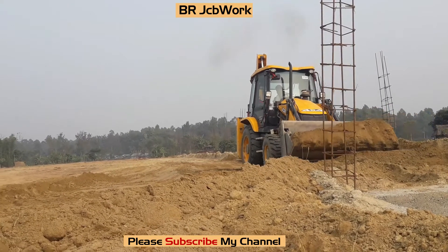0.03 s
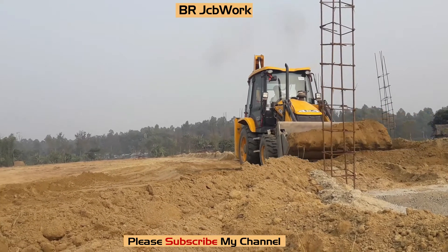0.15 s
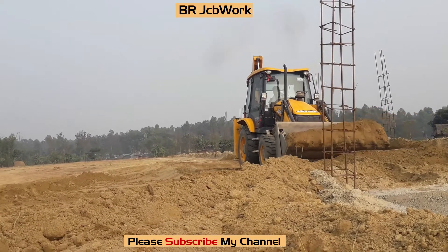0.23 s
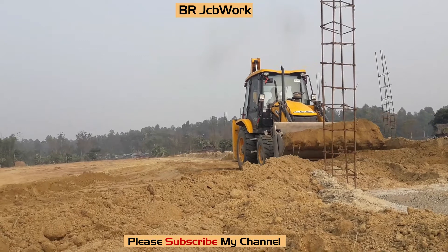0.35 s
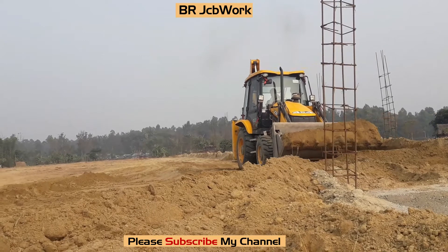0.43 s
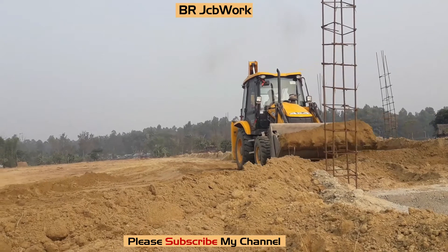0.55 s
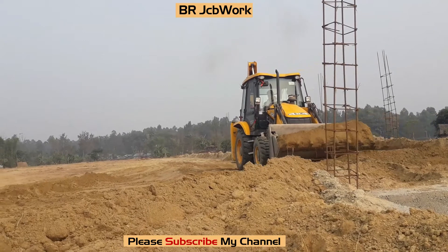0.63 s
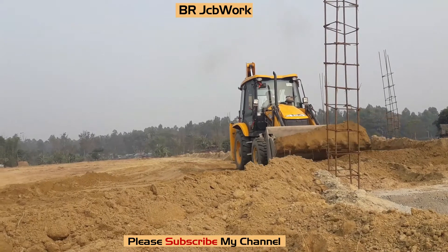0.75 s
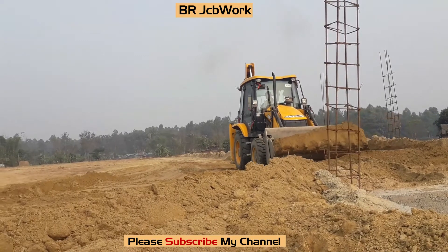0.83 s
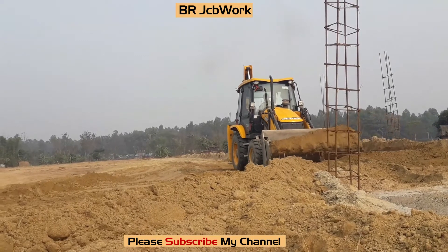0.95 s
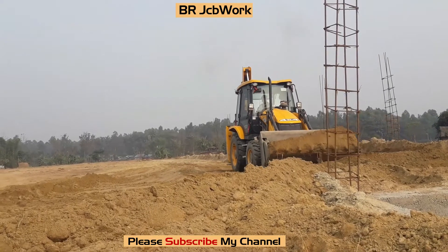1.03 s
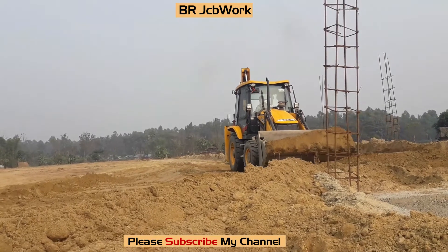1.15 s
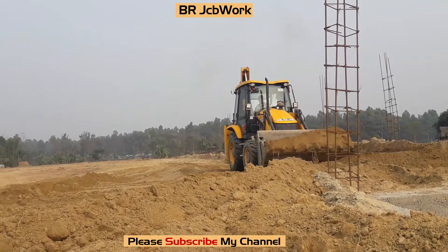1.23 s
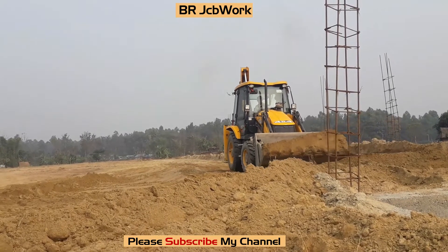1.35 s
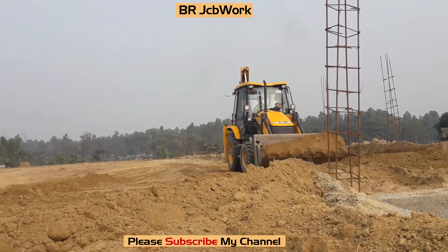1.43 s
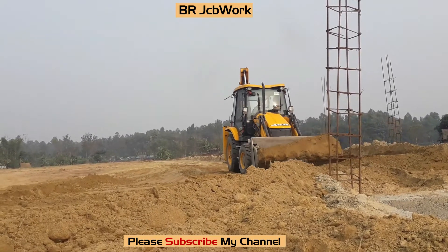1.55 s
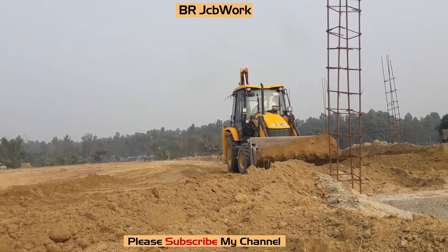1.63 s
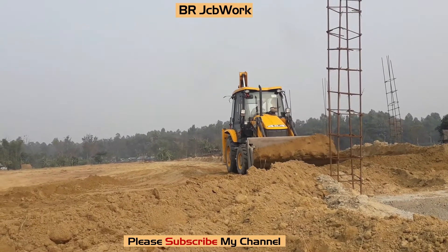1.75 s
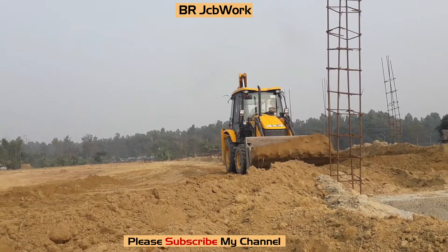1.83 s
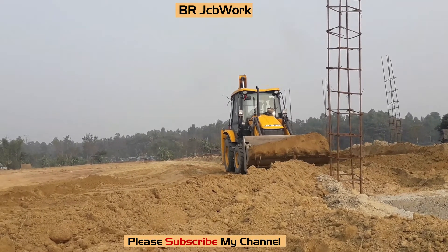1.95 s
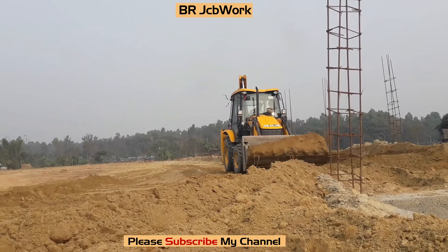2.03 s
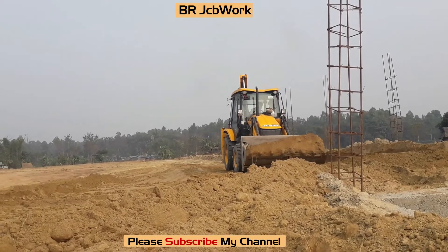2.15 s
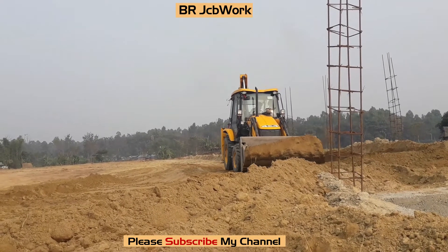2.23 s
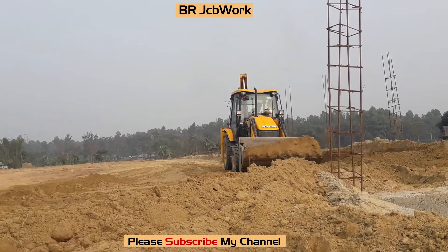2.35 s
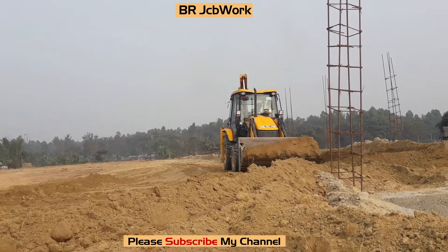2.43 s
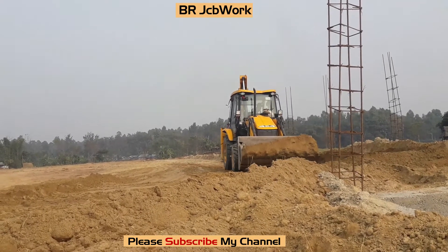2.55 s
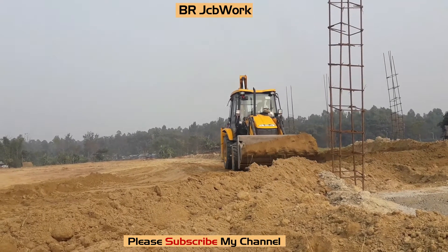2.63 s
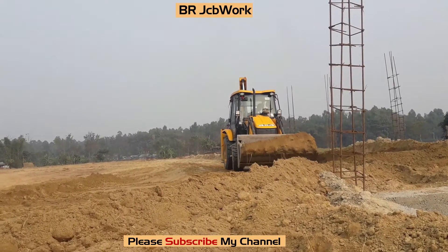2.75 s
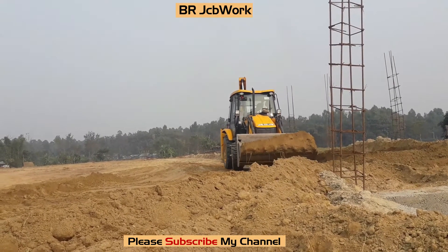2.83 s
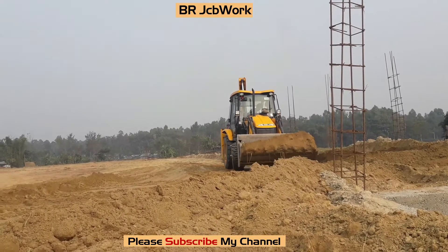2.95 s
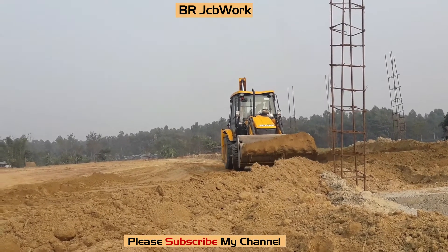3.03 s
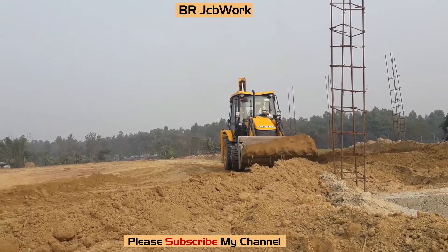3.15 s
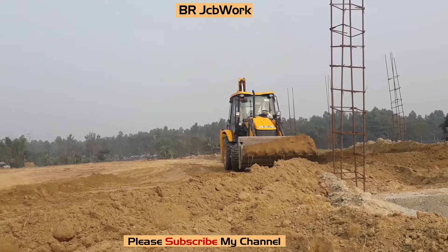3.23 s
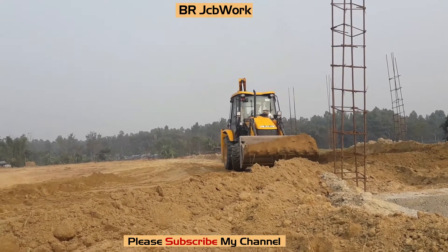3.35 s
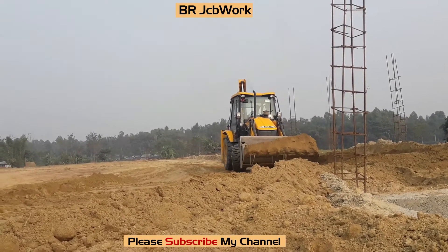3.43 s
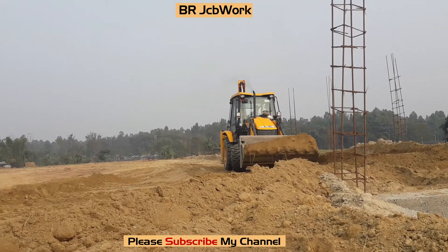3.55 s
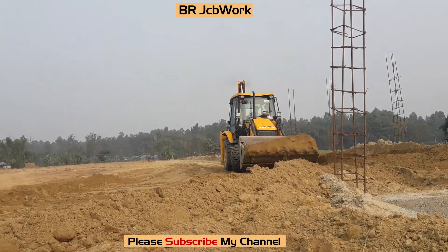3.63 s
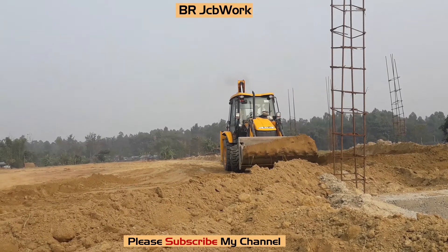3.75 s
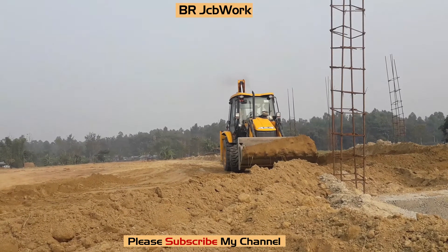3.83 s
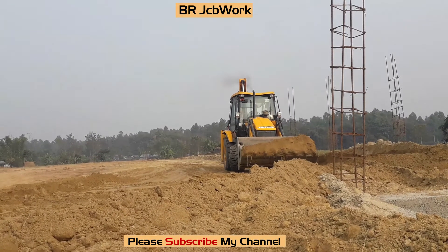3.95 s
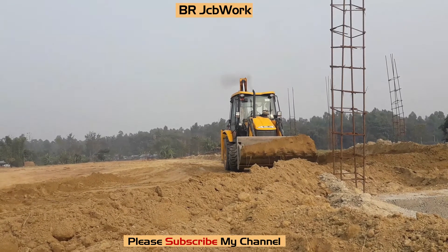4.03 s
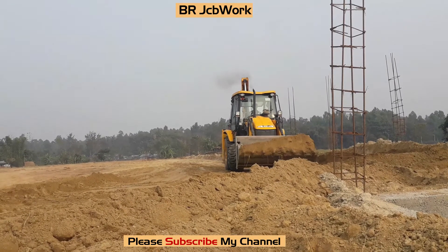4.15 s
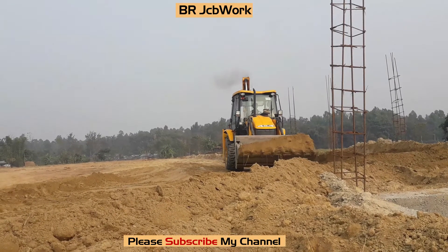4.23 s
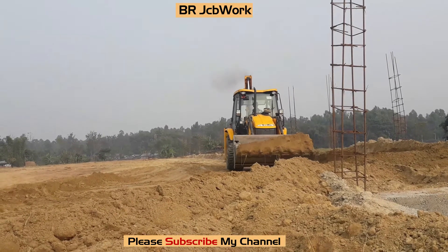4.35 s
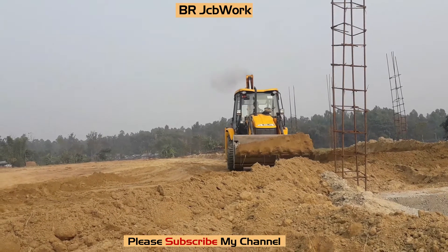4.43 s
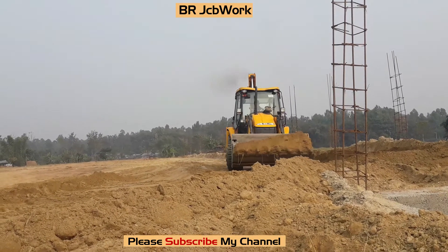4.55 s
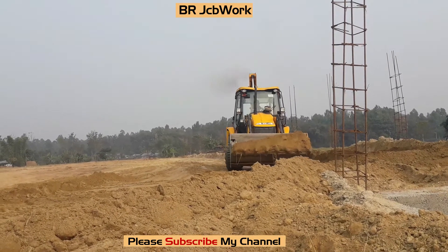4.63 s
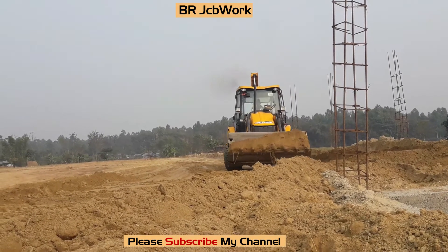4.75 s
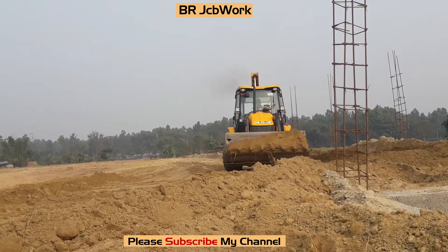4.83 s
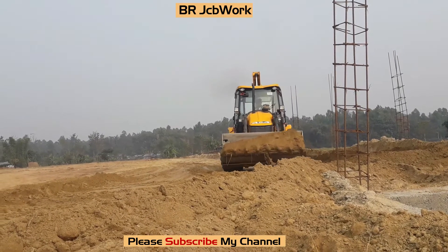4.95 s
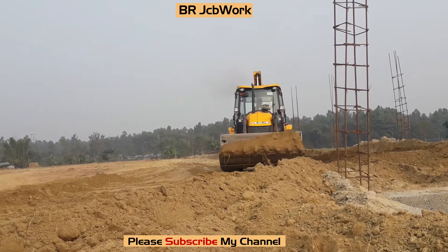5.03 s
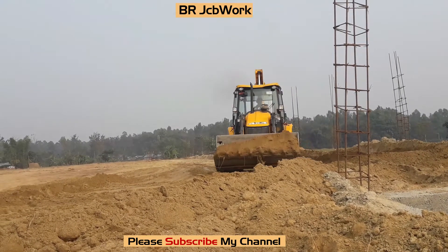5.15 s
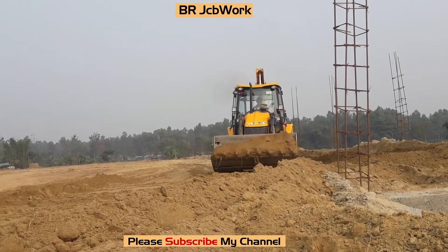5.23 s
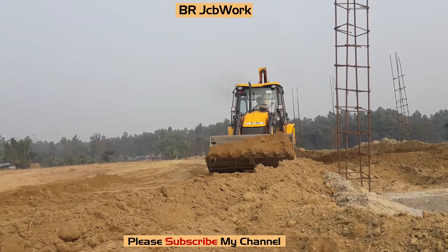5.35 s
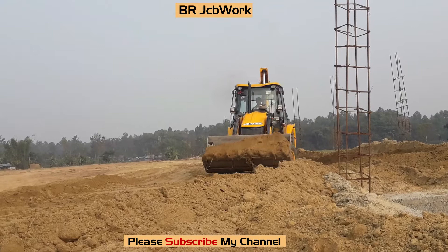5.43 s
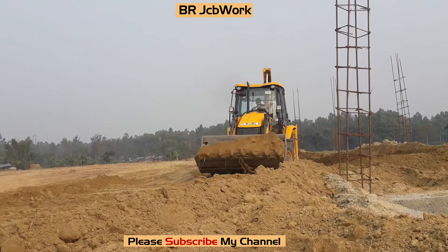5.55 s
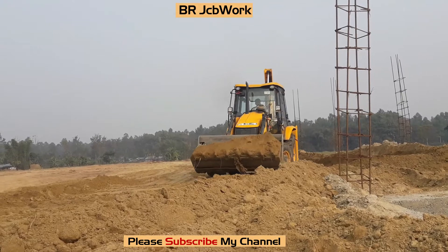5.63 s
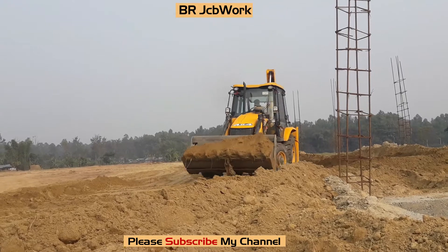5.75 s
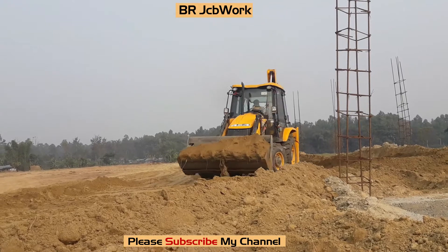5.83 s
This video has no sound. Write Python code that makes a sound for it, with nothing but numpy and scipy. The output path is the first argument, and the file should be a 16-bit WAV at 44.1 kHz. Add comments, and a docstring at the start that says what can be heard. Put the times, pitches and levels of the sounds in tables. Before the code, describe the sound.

A diesel backhoe loader works soil on an open site. Its engine starts fast and loud, eases down to a slow, soft idle near three seconds, then knocks sharply with dull low thuds and climbs back to a full roar. A thin turbo whistle falls and rises with it. Mono, fairly dry, no echo.

```python
"""Distant diesel digger

A four-cylinder digger works a soil pile in the open: eases to idle, knocks hard as fuel returns, revs up again.
Exhaust, pops and fan lines are locked to the firing rate or fan shaft; block noise, knock cracks and hiss are
filtered noise. The turbocharger whistle is narrow noise on a moving pitch; the low thuds are damped sines."""
import sys
import numpy as np
from scipy import signal
from scipy.fft import rfft, irfft
from scipy.io import wavfile
from scipy.ndimage import uniform_filter1d

SR = 44100
rng = np.random.default_rng(int(sys.argv[2]) if len(sys.argv) > 2 else 0)


def pcm_store(signal):
    """Save signal as 16-bit PCM."""
    levels = np.round(np.clip(np.atleast_2d(signal), -1, 1) * 32767)
    wavfile.write(sys.argv[1], SR, levels.astype(np.int16).T)


N = 259308  # samples

# Engine speed: (time [s], firing rate [1/s])
FIRING_RATE = [(0.0, 56.72), (0.55, 56.02), (0.8, 57.15), (1.4, 56.1), (1.9, 51.28), (2.72, 32.81),
               (2.9, 29.87), (3.02, 31.33), (3.2, 31.94), (3.35, 29.46), (3.42, 34.79), (3.5, 38.47),
               (3.8, 43.67), (3.93, 48.74), (4.41, 56.23), (4.63, 57.38), (5.3, 57.31), (5.88, 58.86)]
# Fuel burnt per firing, set by pedal and governor: (time [s], level re full [dB])
FUEL_LEVEL = [(0, -0.5), (1.0, -7), (1.45, -11), (1.9, -15.5), (2.8, -32), (2.91, -16), (2.945, -1),
              (2.99, -5.5), (3.02, -8), (3.2, -13.5), (3.31, -19), (3.365, -1.5), (3.57, 0.5), (3.6, -13),
              (3.69, -7), (3.73, -2.5), (3.93, -2), (4.0, -5), (4.25, -4), (4.6, -7), (5.88, -4)]
# Load on the crank: (time [s], level re full [dB])
CRANK_LOAD = [(0, -5), (1.0, -6), (1.4, -8), (1.6, -19), (1.9, -21), (2.8, -24), (3.35, -28), (3.62, -11),
              (3.78, -7), (4.25, -1), (4.6, -2), (5.88, -6.5)]
# Exhaust orders 1-4: (level at full load and speed [dB], share of load dB [1], speed slope [dB/octave],
# drift as the machine turns [dB/s], rms waver [dB])
EXHAUST_ORDERS = [(-30.5, 1.26, 10, -0.3, 1.1), (-28, 1.06, -5, 0.97, 0.4), (-23.5, 0.44, 9.5, -0.01, 0),
                  (-27.5, 0.47, 4, 0.46, 3.5)]
# Block noise, rows clatter, rattle, upper panel, lower panel: (level at full fuel and speed [dB],
# share of fuel dB [1], speed slope [dB/octave], drift [dB/s])
BLOCK_LAWS = [(-26, 0.1964, 15.5, -0.6), (-35, 0.1864, 16, -0.59), (-34.5, 0.5, 17, -2.5),
              (-44, 0.66, 4.5, 0.57)]
# Relative noise spectra of the block: (frequency [Hz], density [dB per Hz])
RUMBLE_SPECTRUM = [(18, -77), (30, -52), (48, -19), (92, -14.5), (113, -4.5), (168, -3), (200, -4),
                   (237, -1.5), (326, -28), (420, -16.5), (550, -44), (920, -120)]
CLATTER_SPECTRUM = [(170, 0.5), (290, 3), (317, -3.5), (431, -7), (516, -2.5), (754, -13.5), (953, -6.5),
                    (1080, -14.5), (1220, -6), (1500, -13.5), (1860, -5.5), (2070, -23), (2500, -32),
                    (3250, -51.5), (5500, -120)]
RATTLE_SPECTRUM = [(1410, -41), (2400, 5), (2710, 3.5), (4050, 1.5), (4830, -5.5), (5380, 0.5), (5950, -3),
                   (6760, 2.5), (7250, 0), (7980, -49.5), (8600, -16), (11200, -74), (18900, -120)]
HISS_SPECTRUM = [(4470, -35), (7600, 9.5), (8450, -6), (9310, -2), (10300, -0.5), (11300, -1), (12200, -10),
                 (13100, -3), (14300, -1.5), (15700, -19)]
# Panel modes within the clatter: (frequency [Hz], bandwidth [Hz], level re clatter noise [dB])
PANEL_MODES = [(1216, 63, -24), (1688, 41.5, -12.5), (1825, 54, -24), (517, 56, -15.5)]
# Relative knock spectrum: (frequency [Hz], density [dB per Hz])
KNOCK_SPECTRUM = [(300, -11), (700, -4), (1230, 8.5), (1500, -2.5), (1900, -11.5), (2700, -5.5),
                  (4800, -17), (5500, -18), (6800, -8.5), (8000, -19.5), (9000, -26), (11500, -29),
                  (15000, -40)]
# Block modes rung by the knock: (frequency [Hz], bandwidth [Hz], level re knock noise [dB])
KNOCK_RING_MODES = [(1297, 64, -13), (5480, 130, -15), (6700, 460, -23), (8700, 390, -29)]
# Turbocharger blade whistle: (time [s], pitch [Hz])
WHISTLE_PITCH = [(0, 15570), (.89, 15290), (1.47, 14580), (1.62, 14180), (1.86, 13790), (2.25, 11620),
                 (2.49, 10250), (2.91, 8310), (3.06, 8620), (3.33, 8020), (3.45, 8750), (3.61, 9290),
                 (3.72, 9320), (3.9, 10545), (4.02, 11430), (4.12, 11750), (4.3, 13200), (4.48, 14370),
                 (4.72, 15440), (5.0, 16000)]
# Whistle level by pitch: (pitch [Hz], level [dB])
WHISTLE_LEVEL = [(8000, -70), (8800, -66), (9500, -69), (10400, -64), (11200, -67), (12600, -65),
                 (13900, -66), (14200, -51), (14550, -66), (15500, -61), (16000, -66)]
# Low thuds, bucket or frame: (start [s], level before soft onset [dB], frequency [Hz], 60 dB decay [s])
THUD_EVENTS = [(1.504, -24, 120, 0.076), (1.691, -17, 91, 0.076), (3.084, -6, 135, 0.031),
               (3.172, -19, 131, 0.13), (3.487, -3, 119, 0.052), (3.558, 1, 114, 0.049),
               (3.597, -7.5, 114, .08), (4.954, -9, 94, 0.092)]
# Microphone dips and bumps: (frequency [Hz], 1/e half-width [Hz], gain [dB])
MICROPHONE_BUMPS = [(1583, 20, -6), (2460, 99, -14), (4970, 270, -1.5), (12100, 370, -5), (14500, 200, 1)]

FULL_SPEED_HZ = 57  # firings per second
FIRST_FIRING_INTERVALS = .58
EXHAUST_DELAY_INTERVALS = .11
SETTLE_S, COAST_S = 0.053, 0.15  # noise lag behind fuel; block noise lag behind crank
RUMBLE_DB, RUMBLE_FUEL_SHARE, RUMBLE_DB_PER_OCTAVE = -22.5, 0.26, 13
HISS_DB, HISS_DB_PER_OCTAVE = -54, 15  # follows turbocharger speed
KNOCK_DB, KNOCK_DB_PER_OCTAVE = -36.5, 2
SECOND_STRIKE_S = 0.00544
POP_DELAY_S, POP_WIDTH_S, POP_DB, POP_REFERENCE_HZ = .003, .0013, 14.5, 41.0
RING_HZ, RING_WIDTH_HZ = (1180, 966), 10.6
FAN_RATIO, FAN_LAG_S = 5.24, .08  # upper line Hz per firing per second
FAN_DB, FAN_DB_PER_OCTAVE = -37, 10.5
TURBO_RATIO = 275  # whistle Hz per firing per second, turbine caught up
FLUTTER_CALM, FLUTTER_PER_LAG, FLUTTER_DB = .15, 5.1, -11
THUD_RISE_S = 0.0037
BASS_CUT_HZ, EDGE_HZ = 34, 15730


def gain_of(db):
    """Decibels to amplitude gain."""
    return 10 ** (np.asarray(db) / 20)


def evened(x):
    """Scales to rms 1."""
    return x / np.sqrt(np.mean(x ** 2) + 1e-20)


def curve(rows):
    """Second column interpolated over time, one value per sample."""
    time_s, value = np.transpose(rows)
    return np.interp(np.arange(N) / SR, time_s, value)


def colour(x, spectrum):
    """Minimum-phase filter with the given spectrum, output rms 1."""
    point_hz, point_db = np.transpose(spectrum)
    hz = np.abs(np.fft.fftfreq(8192, 1 / SR))
    db = np.interp(np.log(hz + 1), np.log(point_hz + 1), point_db, -90, -90)
    log_gain = db * np.log(10) / 20
    response = np.exp(np.conj(signal.hilbert(log_gain)))
    taps = np.fft.ifft(response).real[:4096]
    return evened(signal.oaconvolve(x, taps)[:N])


def resonate(x, hz, width_hz):
    """Moving resonance: shifts hz down to zero, smooths, shifts back; output rms 1."""
    carrier = np.exp(2j * np.pi * np.cumsum(hz * np.ones(N)) / SR)
    r = np.exp(-np.pi * width_hz / SR)
    smoothed = signal.lfilter([1 - r], [1, -r], x / carrier)
    return evened((carrier * smoothed).real)


def gusts(width_s, depth_db):
    """Random swell of level: twice-smoothed noise, depth as rms dB."""
    width = int(width_s * SR)
    swell = uniform_filter1d(rng.standard_normal(N), width)
    swell = uniform_filter1d(swell, width)
    return gain_of(depth_db * evened(swell))


def lagged(x, lag_s):
    """Follows x with a first-order lag."""
    r = np.exp(-1 / (lag_s * SR))
    return signal.lfilter([1 - r], [1, -r], x - x[0]) + x[0]


def octaves(rate_hz):
    """Speed in octaves re full speed."""
    return np.log2(rate_hz / FULL_SPEED_HZ)


def firing_sizes(firings, spread_db):
    """Random gain held through each firing interval."""
    return gain_of(spread_db * rng.standard_normal(400))[firings.astype(int)]


def leaps(firings, rate_hz, rise_s, fall_s, spread_db):
    """Envelope that leaps at each firing and dies away, with random size."""
    since_s = firings % 1 / rate_hz
    size = firing_sizes(firings, spread_db)
    return size * (1 - np.exp(-since_s / rise_s)) * np.exp(-since_s / fall_s)


def block_levels(rate_hz, fuel_db):
    """Block noise levels in dB from lagged fuel, lagged speed and the slow turn of the machine."""
    fuel_db = lagged(fuel_db, SETTLE_S)
    speed_octaves = octaves(lagged(rate_hz, COAST_S))
    t = np.arange(N) / SR
    return [db + share * fuel_db + slope * speed_octaves + drift * t
            for db, share, slope, drift in BLOCK_LAWS]


def exhaust(firings, rate_hz):
    """Smooth pressure pulse per firing down the pipe: orders 1-4 and a faint seventh."""
    late = firings - EXHAUST_DELAY_INTERVALS  # pulse leaves the pipe after the knock
    load_db = curve(CRANK_LOAD)
    t = np.arange(N) / SR
    low = np.zeros(N)
    for order, (db, share, slope, drift, waver_db) in enumerate(EXHAUST_ORDERS, 1):
        level_db = db + share * load_db + slope * octaves(rate_hz) + drift * t
        low += gain_of(level_db) * gusts(0.092, waver_db) * np.cos(2 * np.pi * order * late)
        if order == 3:
            seventh_db = level_db - 18.5
    seventh = gain_of(seventh_db) * gusts(0.012, 3.1) * np.cos(14 * np.pi * late)
    return np.sqrt(2) * (low + seventh)


def block(firings, rate_hz, fuel_db):
    """Running noise: firing-pulsed rumble, clatter with ringing panels, rattle, hiss."""
    rumble_db = RUMBLE_DB + RUMBLE_FUEL_SHARE * lagged(fuel_db, SETTLE_S)
    rumble_db = rumble_db + RUMBLE_DB_PER_OCTAVE * octaves(rate_hz)
    clatter_db, rattle_db, _, _ = block_levels(rate_hz, fuel_db)
    hiss_db = HISS_DB + HISS_DB_PER_OCTAVE * octaves(curve(WHISTLE_PITCH) / TURBO_RATIO)
    rumble_noise, clatter_noise, rattle_noise, hiss_noise = rng.standard_normal((4, N))

    pulsing = 1 + 0.54 * leaps(firings, rate_hz, 0.00044, 0.0032, 3.2)
    rumble = colour(rumble_noise * pulsing, RUMBLE_SPECTRUM)
    panels = sum(gain_of(db) * resonate(clatter_noise, hz, width_hz) for hz, width_hz, db in PANEL_MODES)
    clatter = evened(colour(clatter_noise, CLATTER_SPECTRUM) + panels)
    treble = gain_of(clatter_db) * clatter
    treble += gain_of(rattle_db) * colour(rattle_noise, RATTLE_SPECTRUM)
    treble += gain_of(hiss_db) * colour(hiss_noise, HISS_SPECTRUM)
    return gain_of(rumble_db) * rumble + gusts(0.0091, 0.71) * gusts(0.1, 0.67) * treble


def ringing(rate_hz, fuel_db):
    """Narrow panel modes kept alive by vibration, as resonated noise."""
    out = np.zeros(N)
    for hz, db in zip(RING_HZ, block_levels(rate_hz, fuel_db)[2:]):
        mode = resonate(rng.standard_normal(N), hz, RING_WIDTH_HZ)
        out += gain_of(db) * gusts(0.062, 1.4) * mode
    return out


def fan(rate_hz):
    """Two wavering low lines on one shaft, plus a band of churned air moving with them."""
    shaft_hz = lagged(rate_hz, FAN_LAG_S)  # in firing-rate units
    hz = FAN_RATIO * shaft_hz
    db = FAN_DB + FAN_DB_PER_OCTAVE * octaves(shaft_hz)
    angle = 2 * np.pi * np.cumsum(hz * gusts(.04, .04)) / SR  # shaft speed wavers slightly
    upper = gusts(0.094, 1.6) * np.cos(angle)
    lower = gain_of(7.5) * gusts(0.024, 4.6) * np.cos(.72 * angle)
    churn = resonate(rng.standard_normal(N), 0.66 * hz, 145.0)
    churn = resonate(churn, 0.68 * hz, 133.0)
    return gain_of(db) * (upper + lower + gain_of(7.5) * churn)


def turbo(firings, rate_hz, fuel_db):
    """Thin blade whistle; exhaust pulses kick and widen it as it spins up."""
    hz = curve(WHISTLE_PITCH)
    lag = np.maximum(1 - hz / (TURBO_RATIO * rate_hz), 0)  # turbine trailing the crank
    flutter = np.clip(gain_of(fuel_db) * (FLUTTER_CALM + FLUTTER_PER_LAG * lag), 0, 1)
    db = np.interp(hz, *np.transpose(WHISTLE_LEVEL)) + FLUTTER_DB * flutter
    thin_noise, wide_noise = rng.standard_normal((2, N))
    kicks = 1 + 14.0 * flutter * leaps(firings, rate_hz, .001, 0.0037, 1.46)
    thin = resonate(thin_noise, hz, 28.0)
    wide = resonate(resonate(wide_noise, hz, 600.), hz, 600.)
    return gain_of(db) * ((1 - 0.48 * flutter) * thin + (0.35 + 1.5 * flutter) * kicks * wide)


def knock(firings, rate_hz, fuel_db):
    """Each firing cracks through the block, rings its modes and pushes out a short low pop."""
    strength = gain_of(KNOCK_DB + fuel_db + KNOCK_DB_PER_OCTAVE * octaves(rate_hz))
    envelope = leaps(firings, rate_hz, .0009, .005, 1.5)
    envelope = envelope + 0.33 * np.roll(envelope, int(SECOND_STRIKE_S * SR))  # weaker second strike
    crack = evened(envelope) * rng.standard_normal(N)
    body = colour(crack, KNOCK_SPECTRUM)
    modes = sum(gain_of(db) * resonate(body, hz, width_hz) for hz, width_hz, db in KNOCK_RING_MODES)

    u = (firings % 1 / rate_hz - POP_DELAY_S) / POP_WIDTH_S
    pop = firing_sizes(firings, 2) * (1 - u ** 2) * np.exp(-u ** 2 / 2)
    pop_gain = gain_of(POP_DB) * (POP_REFERENCE_HZ / rate_hz) ** 2  # pops blur as speed rises
    return strength * (body + modes + pop_gain * pop)


def thuds():
    """Low damped sines with a soft start."""
    t = np.arange(N) / SR
    out = np.zeros(N)
    for start_s, db, hz, t60_s in THUD_EVENTS:
        u = np.maximum(t - start_s, 0)
        decay = gain_of(db - 60 * u / t60_s)
        out += decay * (1 - np.exp(-u / THUD_RISE_S)) * np.sin(2 * np.pi * hz * u)
    return out


def scene():
    """Sums all sources into one channel."""
    rate_hz, fuel_db = curve(FIRING_RATE), curve(FUEL_LEVEL)
    firings = np.cumsum(rate_hz) / SR - FIRST_FIRING_INTERVALS + 1  # a firing at each whole number
    engine = exhaust(firings, rate_hz) + block(firings, rate_hz, fuel_db)
    engine += ringing(rate_hz, fuel_db) + knock(firings, rate_hz, fuel_db)
    return (engine + fan(rate_hz) + turbo(firings, rate_hz, fuel_db) + thuds())[None]


def record(dry):
    """Microphone dips, bumps and bass cut, then a steep treble limit."""
    hz = np.fft.rfftfreq(2 * N, 1 / SR)
    tone_db = sum(db * np.exp(-((hz - f) / width_hz) ** 2) for f, width_hz, db in MICROPHONE_BUMPS)
    bass_cut = 1 / np.sqrt(1 + (BASS_CUT_HZ / (hz + 1)) ** 4)
    heard = irfft(rfft(dry, 2 * N) * gain_of(tone_db) * bass_cut)[:, :N]
    limit = signal.firwin(1023, EDGE_HZ, window=("kaiser", 9), fs=SR)
    return signal.oaconvolve(heard, limit[None], "same")


dry = scene()
out = record(dry)
pcm_store(out)
```